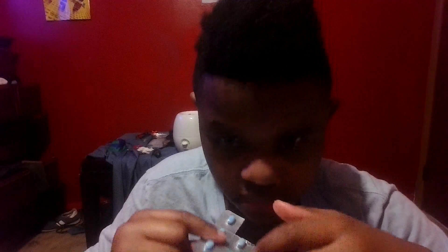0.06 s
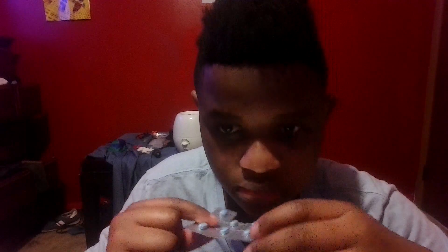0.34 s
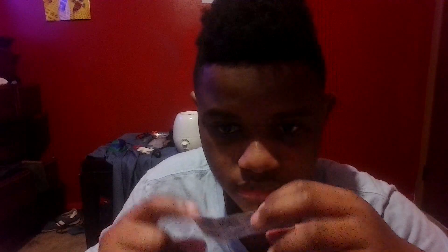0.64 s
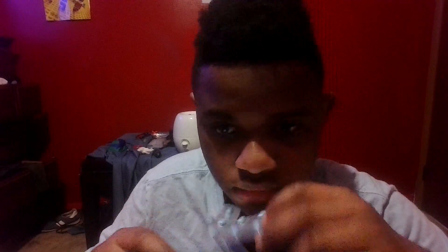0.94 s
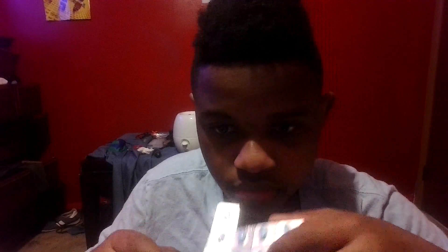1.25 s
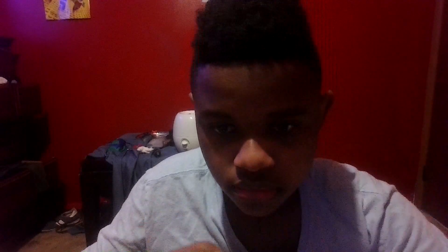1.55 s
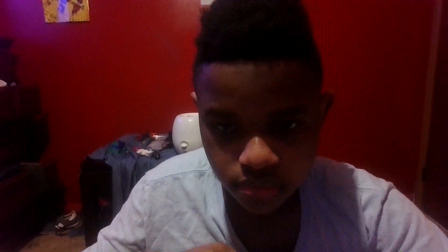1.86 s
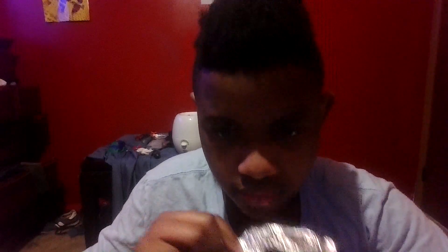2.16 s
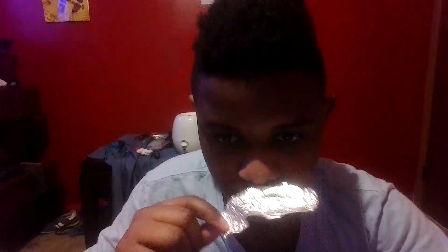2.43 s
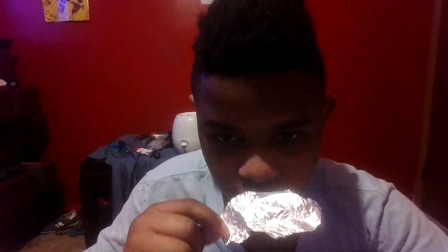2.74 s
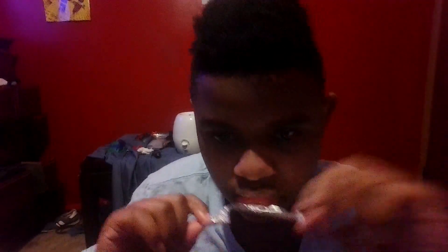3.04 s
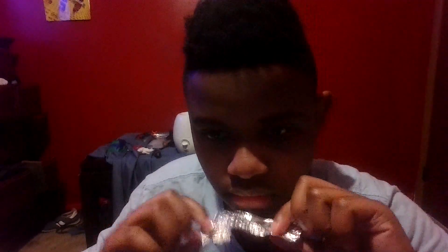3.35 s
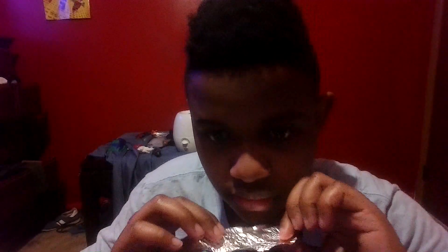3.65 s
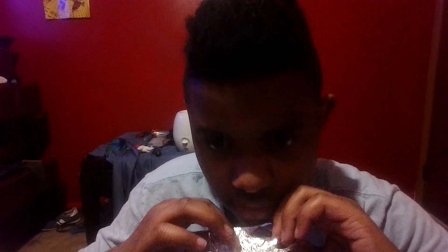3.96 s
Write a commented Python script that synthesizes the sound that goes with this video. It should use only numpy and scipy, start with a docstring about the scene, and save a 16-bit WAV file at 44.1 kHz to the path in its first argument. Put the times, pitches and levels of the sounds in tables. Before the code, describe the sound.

Stiff plastic packaging crinkles close to the microphone, with scattered snaps building to a sharper burst as it is pulled open. After a short pause, crumpled foil crackles as it is folded. The small room hums faintly.

```python
"""Crinkling plastic and foil

Stiff plastic packaging is bent and pulled open; then, after a soft swish of a hand or sleeve, crumpled
foil is pinched and folded, close to a pair of microphones. A thin sheet gives way by buckling: creases
snap over a rustle of tiny buckles, and whole panels flip with a hollow pop. A fingertip squeaks, and a
quick hand movement buffets the right microphone. The small room is quiet, with mains hum and faint hiss."""
import sys
import numpy as np
from scipy import signal
from scipy.fft import rfft, irfft, next_fast_len
from scipy.io import wavfile
from scipy.ndimage import uniform_filter1d

SR = 44100
rng = np.random.default_rng(int(sys.argv[2]) if len(sys.argv) > 2 else 0)


def wav_out(sig):
    """Save sig, one row per channel (or a flat mono array), as 16-bit PCM at SR to the path in sys.argv[1]."""
    wavfile.write(sys.argv[1], SR, np.round(np.clip(np.atleast_2d(sig).T, -1, 1) * 32767).astype(np.int16))


N = 176400

# Creases that snap: t/s, level/dB, body/dB, treble/dB, main resonance f/Hz
PLASTIC_CREASES = [(.001, -23.5, 11.5, -3, 2900), (0.014, -29.5, -4, 3, 2970), (0.0712, -43, 8, -7, 1870),
                   (0.108, -36, -7, -8, 9000), (0.1124, -30.5, 4, -3, 5430),
                   (0.1244, -30, 2.5, -5.5, 15000), (0.132, -34.5, 2, 1, 2940), (0.188, -38, -1, 7, 2600),
                   (0.275, -34.5, -3, -11, 7000), (0.2852, -29, -20, 0.5, 4700),
                   (0.3403, -37, -7, -7, 7500), (0.3593, -33.5, -1, -6, 4700), (0.483, -47.5, -6, 8, 5800),
                   (.599, -43, -4, -1, 9900), (0.8345, -50, -16, -3, 2500), (.956, -44, -3, 14, 6000),
                   (1.021, -36, -5, 4, 2000), (1.1978, -41.5, -8, -15, 3280), (1.212, -45, 3, 6, 2020),
                   (1.2353, -34.5, -7, 1, 2700), (1.318, -46.5, 6, -11, 3600), (1.4626, -33, 15, -8, 2360),
                   (1.471, -29, 6, -8, 3300), (1.5126, -24.5, 5.5, 4.5, 8300), (1.5187, -28, 4, 0, 2050),
                   (1.534, -39, -8, 8, 4480), (1.566, -35, 15, 1, 2060), (1.68, -38.5, -2, 0, 10100),
                   (1.717, -30, -10, -3, 15000), (1.758, -24, 2.5, 0, 10000), (1.8045, -34.5, 3, -1, 2300),
                   (1.8098, -30.5, -3, -4, 1530), (1.818, -31, -8, 2, 2530), (1.846, -26, 0, 5, 5850),
                   (1.8496, -19.5, -12, -3.5, 9800), (1.8917, -27, -7, 0, 3020),
                   (1.896, -21.5, -24, -8, 14600), (1.9013, -20, 2, -2, 13600),
                   (1.9052, -14.5, -13, -5, 4850), (1.9058, -17.5, -8, -6, 2480),
                   (2.007, -31.5, 2.5, -3, 15000), (2.026, -30.5, 6, 2, 12800),
                   (2.0288, -27.5, -14, 7.5, 5450)]
FOIL_CREASES = [(3.0938, -27.5, -1, -1, 7900), (3.0976, -16, 11, 13, 7550), (3.0995, -22.5, -18, -4, 4200),
                (3.1306, -26, 4.5, -9.5, 14500), (3.2116, -17.5, 24.5, 18, 14500),
                (3.215, -22, -25, -9, 3900), (3.255, -28.5, 5, -6, 7700), (3.334, -29, -8, -13, 5900),
                (3.3667, -32.5, -11, -10, 11700), (3.3706, -36, 2, -11, 13000), (3.385, -10, -1, 0, 15600),
                (3.3904, -13.5, -9, 1, 1800), (3.402, -31, 8, -16, 1580), (3.4421, -19, -30, -6, 7800),
                (3.48, -37.5, 18, -4, 6000), (3.4945, -30, 13, 3, 4740), (3.5086, -27.5, 14, 2, 5850),
                (3.513, -31, 11, -1, 2700), (3.5506, -31.5, -9, 1, 13400), (3.61, -39, 3, 12, 6000),
                (3.6239, -36.5, 17, -2, 13000), (3.642, -28.5, 13, 3, 13500), (3.656, -45, 4, 10, 14000),
                (3.6657, -21, 1, 6, 14000), (3.85, -42, -6, -6, 5100), (3.863, -35.5, 6, -10, 6060)]
# Rustles of the flexed plastic: t/s, duration/s, level/dB, body/dB, treble/dB
PLASTIC_RUSTLES = [(0, 0.015, -37.5, 7, -13), (0.029, 0.12, -56, 1, 0), (0.108, 0.028, -46.5, 5, 1),
                   (0.17, 0.024, -52.5, 1, -2), (0.264, 0.035, -42, 6.5, 0.5), (0.306, 0.046, -53.5, -3, 0),
                   (0.341, 0.027, -43.5, 0.5, -2.5), (0.562, 0.036, -52, 12, 12.5),
                   (1.006, 0.048, -49.5, 10, -3), (1.203, 0.049, -52.5, 11, -7), (1.449, 0.046, -46, 1, -9),
                   (1.492, 0.057, -50.5, -8, 3), (1.55, 0.039, -51.5, 6, -5), (1.684, 0.058, -46.5, 7, 4),
                   (1.695, 0.066, -45, -7, 6.5), (1.748, 0.025, -35.5, 9.5, 7),
                   (1.785, 0.048, -43.5, 3, -3), (1.832, 0.052, -42.5, -0.5, -2.5),
                   (1.846, 0.0059, -31, -11, 0), (1.884, 0.03, -33.5, 6.5, 2.5),
                   (2.009, 0.033, -43, -32, 1)]
# A soft swish of a moving hand or sleeve (first row), then rustles of the foil: same columns
SWISH_AND_FOIL_RUSTLES = [(2.989, 0.09, -59, 9, -6.5), (3.094, 0.022, -33, 0, -1),
                          (3.121, 0.03, -38.5, 5, -0.5), (3.16, 0.091, -47.5, 9.5, -4),
                          (3.2, 0.0099, -35, -17, -4), (3.207, 0.019, -28, 0, -1),
                          (3.235, 0.038, -34.5, 3, -4.5), (3.278, 0.031, -51, 9, -2),
                          (3.395, 0.065, -45, 6.5, -11), (3.485, 0.031, -47, -14, -4),
                          (3.565, 0.11, -51.5, 10, -1), (3.64, 0.057, -40, 8, -1.5),
                          (3.71, 0.15, -49, 6.5, -0.5), (3.831, 0.035, -48.5, 6, -13.5)]
# Panels that flip: t/s, level/dB, f/Hz
PANEL_FLIPS = [(.834, -45, 2550), (1.477, -33, 216), (1.755, -26, 554), (1.796, -33, 495),
               (1.803, -28.5, 530), (1.85, -32, 496), (1.895, -28, 530), (1.904, -28.5, 503),
               (3.211, -32, 684), (3.3905, -20.5, 1510), (3.509, -33.5, 540), (3.641, -32.5, 930),
               (3.664, -37, 980)]
# Spectral envelope of each sheet: f/Hz, relative level/dB
PLASTIC_SPECTRUM = [(100, -10), (250, -11.5), (400, -11.5), (520, -6.5), (660, -8), (950, -7), (1400, -5),
                    (1800, -6), (2250, -2.5), (3600, -4), (4700, -4.5), (7000, -1.5), (12000, -5),
                    (16000, -1.5)]
FOIL_SPECTRUM = [(100, -30), (250, -11.5), (400, -4.5), (540, -6.5), (780, -8.5), (1100, -12), (1800, -6),
                 (2400, -3.5), (3700, -3.5), (5000, -0.5), (8000, 2), (12500, 2), (15200, 4), (16000, -3)]
# Partials of the fingertip squeak: f/Hz, level/dB
SQUEAK_PARTIALS = [(9100, -52.5), (10900, -58)]
# The plastic is turned in the fingers: start t/s, end t/s
TURNING_SPANS = [(.4, .7), (.9, 1.44)]
# Reverberation time of the room: f/Hz, T60/s
REVERB_TIMES = [(200, 0.56), (2000, 0.33), (6000, 0.57), (16000, 0.25)]
# Room air and microphone hiss: f/Hz, relative spectral density/dB
AIR_SPECTRUM = [(8, -12.5), (24, 14), (45, -3), (70, -1), (95, -7), (200, -7.5), (400, -14.5), (700, -18),
                (1050, -19), (1300, -25), (1550, -18), (2000, -27), (2500, -26.5), (4500, -31.5),
                (11000, -32.5), (15500, -30)]
# Likeness of that noise at the two microphones: f/Hz, correlation coefficient
AIR_CORRELATION = [(20, 0.9), (500, 0.93), (1500, 0.7), (3000, 0.056), (6000, 0.057), (16000, .05)]

PLASTIC_RING_S, FOIL_RING_S, BODY_RING_S = 0.0025, 0.0027, 0.0053  # bending waves; low flexing
YIELD_S, YIELD_DB, LEAD_S = 0.0017, -9.5, 0.008  # a crease starts to give ahead of its crack
FULL_SNAP_DB, RING_SHRINK = -23.5, 0.22  # quieter creases are smaller and ring less
CLICKS_PER_S, CLICK_SPREAD_DB, CLICK_RING_S = 3000, 2, 0.00066  # the grain of a rustle
BODY_HZ, MID_LOW_HZ, MID_HIGH_HZ, TREBLE_HZ, EDGE_HZ = 930, 2300, 4300, 9000, 16000
FREQS = np.fft.rfftfreq(2048, 1 / SR)


def crinkle(spectrum, ring_s, creases, rustles):
    """Superposition: snaps and rustles with one spectral envelope add linearly."""
    out = np.zeros((2, N))
    for start, *row in creases:
        add(out, start - LEAD_S, snap(spectrum, ring_s, *row))
    for start, *row in rustles:
        add(out, start, rustle(spectrum, *row))
    return out


def snap(spectrum, ring_s, level_db, body_db, treble_db, main_hz, main_db=10, main_octaves=0.25):
    """Snap-through buckling: a crease yields, cracks and launches bending waves; the low ones die last."""
    t = np.arange(2048) / SR - LEAD_S
    waves = rng.standard_normal(len(t))
    low = lowpass(waves, BODY_HZ)
    decay_s = ring_s * np.clip(amp(RING_SHRINK * (level_db - FULL_SNAP_DB)), 0.65, 1)
    damping = np.exp(-(abs(t) / decay_s) ** 1.35)  # the fingers cut the ring short
    ring = (waves - low) * damping + low * np.exp(-abs(t) / BODY_RING_S)
    yielding = waves * amp(YIELD_DB) * np.exp(-abs(t) / YIELD_S)
    burst = np.where(t < 0, yielding, ring)
    burst[round(LEAD_S * SR)] += 2.4  # the crack
    lift_db = main_db / (1 + (np.log2((FREQS + 1) / main_hz) / main_octaves) ** 2)
    patch = sheet(spectrum, body_db, treble_db, facet_db=7, lift_db=lift_db)
    return amp(level_db) * to_pair(signal.fftconvolve(flatten(burst, width_hz=580), patch))


def rustle(spectrum, length_s, level_db, body_db, treble_db, layers=4, attack_s=0.0032, release_s=0.0092):
    """Shot noise: dense random clicks merge into the rustle of tiny buckles, or into a soft swish."""
    t = np.arange(SR // 5) / SR
    envelope = np.minimum(t / attack_s, 1) * np.exp(-np.maximum(t - length_s, 0) / release_s)
    out = 0
    for _ in range(layers):
        sizes = amp(CLICK_SPREAD_DB * np.minimum(rng.exponential(1, len(t)), 4))
        signs = rng.choice([-1, 1], len(t))
        fires = rng.random(len(t)) < CLICKS_PER_S / layers / SR
        ring = rng.standard_normal(512) * np.exp(-t[:512] / CLICK_RING_S)
        grains = unit(signal.fftconvolve(sizes * signs * fires, ring)[:len(t)]) * envelope
        patch = sheet(spectrum, body_db, treble_db, facet_db=3.5)
        out = out + to_pair(signal.fftconvolve(grains, patch))
    return amp(level_db) * out / np.sqrt(layers)


def sheet(spectrum, body_db, treble_db, facet_db, lift_db=0, facet_width_hz=301.8):
    """Resonant filtering: the impulse response of a patch whose facets have random resonances."""
    tilt_db = read([(BODY_HZ, body_db), (MID_LOW_HZ, 0), (MID_HIGH_HZ, 0), (TREBLE_HZ, treble_db)], FREQS)
    ripple = np.interp(FREQS / facet_width_hz, np.arange(len(FREQS)), rng.uniform(-0.82, 1, len(FREQS)))
    gain = amp(read(spectrum, FREQS) + tilt_db + facet_db * ripple + lift_db)
    return causal(gain / np.sqrt(np.mean(gain[FREQS < EDGE_HZ] ** 2)))


def pops(decay_cycles=2.84, sag=0.065, roughness=0.76):
    """Damped oscillation: a flipped panel rings with a hollow note whose pitch sags as it relaxes."""
    out = np.zeros((2, N))
    t = np.arange(4096) / SR
    for start, level_db, hz in PANEL_FLIPS:
        cycles = np.cumsum(hz * (1 + sag * np.exp(-t * hz / decay_cycles))) / SR
        flutter = 1 + roughness * unit(lowpass(rng.standard_normal(len(t)), hz / 2))
        envelope = np.minimum(cycles / 2, 1) * np.exp(-cycles / decay_cycles)
        add(out, start, amp(level_db) * to_pair(np.sin(2 * np.pi * cycles) * flutter * envelope))
    return out


def squeak(at_s=0.588, width_s=0.013, band_hz=340):
    """Friction: a fingertip sliding over taut plastic excites thin, narrow bands of noise."""
    t = np.arange(N) / SR
    tone = 0
    for hz, level_db in SQUEAK_PARTIALS:
        flutter = lowpass(rng.standard_normal(N), band_hz)
        tone = tone + amp(level_db) * unit(flutter * np.sin(2 * np.pi * hz * t))
    return to_pair(tone * np.exp(-((t - at_s) / width_s) ** 2))


def ticks(per_s=18, floor_db=-55, spread_db=4, low_hz=2210, high_hz=6000):
    """Small-scale buckling: the plastic ticks faintly at random as it is turned in the fingers."""
    out = np.zeros((2, N))
    for start, end in TURNING_SPANS:
        for when, faintness, pitch in rng.random((round((end - start) * per_s), 3)):
            hz = low_hz * (high_hz / low_hz) ** pitch
            level_db = floor_db - spread_db * np.log(faintness)
            tick = snap(PLASTIC_SPECTRUM, PLASTIC_RING_S, level_db, body_db=-14, treble_db=10, main_hz=hz)
            add(out, start + when * (end - start), tick)
    return out


def buffet(at_s=1.4845, width_s=0.0063, hz=79.4, wake_at_s=1.518, wake_width_s=0.021):
    """Turbulence: a hand pushes a low pulse of air and a wake of eddies at the right microphone."""
    t = np.arange(N) / SR
    eddies = unit(lowpass(rng.standard_normal(N), hz=162))
    push = (0.37 * eddies - np.cos(2 * np.pi * hz * (t - at_s))) * np.exp(-((t - at_s) / width_s) ** 2)
    wake = eddies * np.exp(-((t - wake_at_s) / wake_width_s) ** 2)
    left_right = amp([[-21], [0]])
    return left_right * (amp(-15.5) * push + amp(-41.5) * wake)


def moving_room(x, cycles_per_s=7):
    """Time-varying paths: hands and sheet move, so the reflections cycle through three patterns."""
    phase = 2 * np.pi * cycles_per_s * np.arange(N) / SR
    shares = np.array([np.maximum(np.cos(phase + 2 * np.pi * k / 3), 0) for k in range(3)])
    return sum(room(x * share) for share in shares / np.linalg.norm(shares, axis=0))


def room(x, early_db=-8, early_t60_s=0.081, tail_db=-19, tail_rise_s=0.0076, mic_transit_s=0.000098):
    """Reverberation: early reflections from hands, chest and desk, then a short diffuse tail."""
    size = SR // 2
    t = np.arange(size) / SR
    correlation = np.sinc(2 * np.fft.rfftfreq(size, 1 / SR) * mic_transit_s)
    early = irfft(noise_pair(size, correlation)) * amp(-60 * t / early_t60_s)
    hz, frame_s, frames = signal.stft(irfft(noise_pair(size, correlation)), SR, nperseg=256)
    decay = amp(-60 * frame_s / read(REVERB_TIMES, hz)[:, None])
    tail = signal.istft(frames * decay, SR, nperseg=256)[1][:, :size] * np.minimum(t / tail_rise_s, 1)
    gate = (t > 0.0015) * (t < 0.4)
    early, tail = (unit(flatten(part, width_hz=96) * gate) for part in (early, tail))
    response = (amp(early_db) * early + amp(tail_db) * tail) / np.sqrt(size)
    return signal.fftconvolve(x[:1], response, axes=1)[:, :N]


def background(air_db=-49.5, hum_db=-48, hum_hz=120, drift_db=-40, drift_hz=9.5):
    """Noise floor: room air, hiss, mains hum and a slow pressure drift at the right microphone."""
    hz = np.fft.rfftfreq(N, 1 / SR)
    air_spectra = noise_pair(N, read(AIR_CORRELATION, hz)) * amp(read(AIR_SPECTRUM, hz))
    air = amp(air_db) * unit(irfft(air_spectra))
    hum = amp(hum_db) * unit(np.sin(2 * np.pi * hum_hz * np.arange(N) / SR))
    drift = amp(drift_db) * unit(lowpass(rng.standard_normal(N), drift_hz))
    return air + hum + np.outer([0, 1], drift)


def to_pair(x, skew_rad=0.78, skew_hz=8300):
    """Path difference: a sound leads in phase at one microphone, chosen at random."""
    size = next_fast_len(len(x))
    lead = skew_rad * np.minimum(np.fft.rfftfreq(size, 1 / SR) / skew_hz, 1)
    phasor = np.exp(1j * lead * rng.choice([-1, 1]))
    return irfft(rfft(x, size) * np.array([phasor, 1 / phasor]), size)


def noise_pair(size, correlation):
    """Partial coherence: the spectra of two noises with a common part."""
    common, separate = rfft(rng.standard_normal((2, size)))
    share = np.clip(correlation, -1, 1)
    return np.array([common, share * common + np.sqrt(1 - share ** 2) * separate])


def flatten(x, width_hz):
    """Spectral whitening: evens out a burst of noise so that no chance pitch rings."""
    size = x.shape[-1]
    spectrum = rfft(x)
    power = uniform_filter1d(abs(spectrum) ** 2, max(round(width_hz * size / SR), 1), axis=-1)
    return irfft(spectrum * np.sqrt(power.mean() / (abs(power) + 1e-12)), size)


def causal(gain):
    """Minimum phase: an impulse response with this gain and no sound before its start."""
    log_gain = np.log(np.r_[gain, gain[-2:0:-1]] + 1e-6)
    return np.fft.ifft(np.exp(np.conj(signal.hilbert(log_gain)))).real


def lowpass(x, hz):
    """Second-order low-pass filtering."""
    return signal.sosfilt(signal.butter(2, hz, fs=SR, output="sos"), x)


def add(mix, at_s, sound):
    """Superposition of a stereo sound on the mix."""
    start = round(at_s * SR)
    sound = sound[:, max(-start, 0):]
    part = mix[:, max(start, 0):][:, :sound.shape[1]]
    part += sound[:, :part.shape[1]]


def read(points, hz):
    """Interpolation on a log-frequency axis."""
    f, value = np.transpose(points)
    return np.interp(np.log(hz + 1), np.log(f + 1), value)


def amp(db):
    """Decibels to amplitude ratio."""
    return 10 ** (np.asarray(db) / 20)


def unit(x):
    """Normalisation to an rms of one."""
    return x / np.sqrt(np.mean(x ** 2) + 1e-20)


def scene():
    """Direct and reverberant fields: plastic, then a swish and foil, over the noise floor."""
    air = background() + buffet()
    plastic = crinkle(PLASTIC_SPECTRUM, PLASTIC_RING_S, PLASTIC_CREASES, PLASTIC_RUSTLES)
    swish_and_foil = crinkle(FOIL_SPECTRUM, FOIL_RING_S, FOIL_CREASES, SWISH_AND_FOIL_RUSTLES)
    direct = plastic + swish_and_foil + pops() + squeak() + ticks()
    return direct + moving_room(direct) + air


def record(dry):
    """Band limiting: a steep low-pass removes the highest treble."""
    taps = signal.firwin(401, EDGE_HZ, window=("kaiser", 9), fs=SR)
    return signal.oaconvolve(dry, taps[None], "same")


dry = scene()
out = record(dry)
wav_out(out)
```